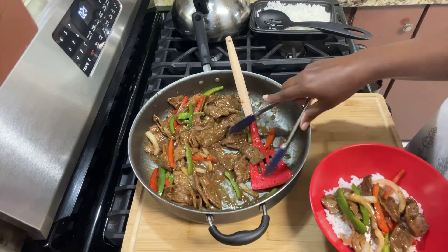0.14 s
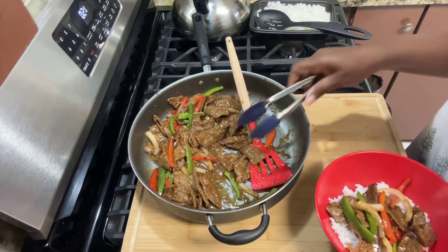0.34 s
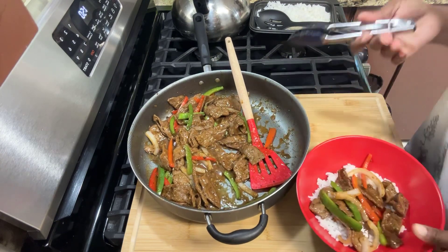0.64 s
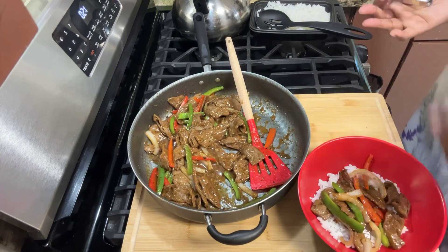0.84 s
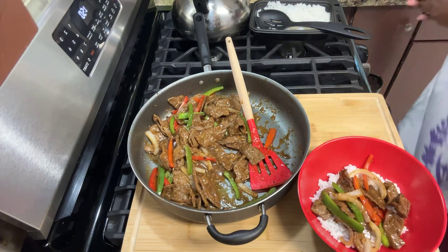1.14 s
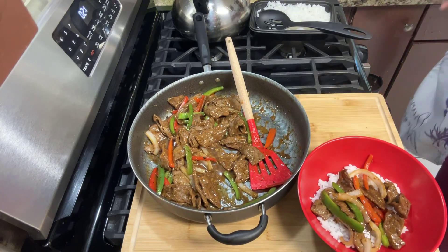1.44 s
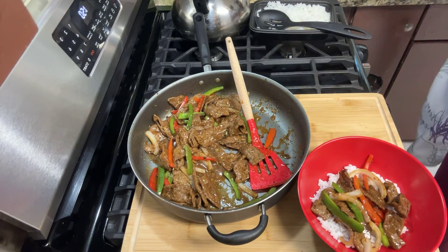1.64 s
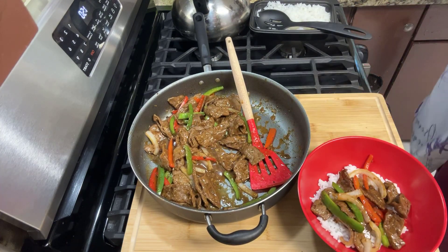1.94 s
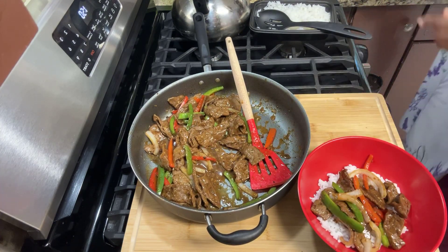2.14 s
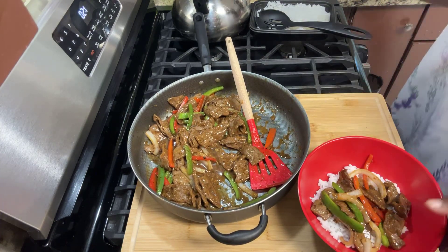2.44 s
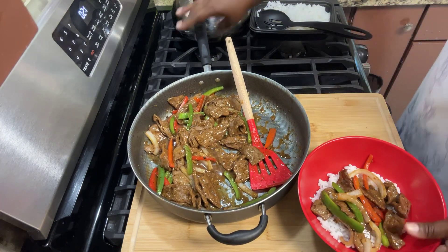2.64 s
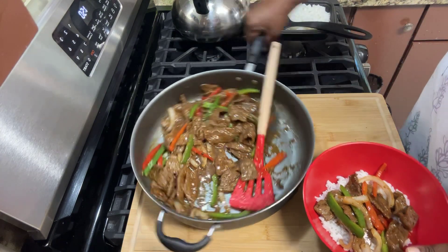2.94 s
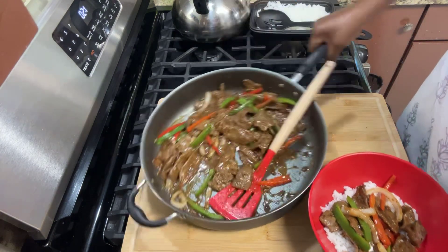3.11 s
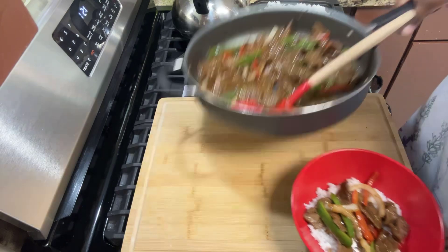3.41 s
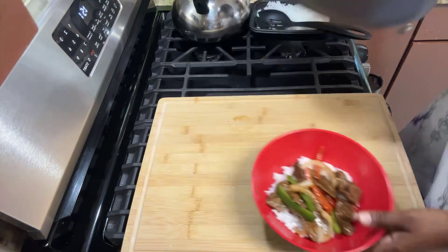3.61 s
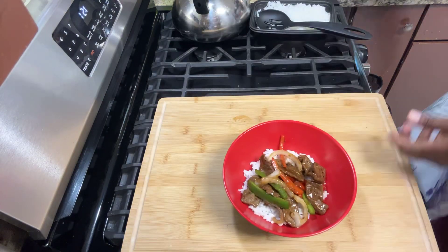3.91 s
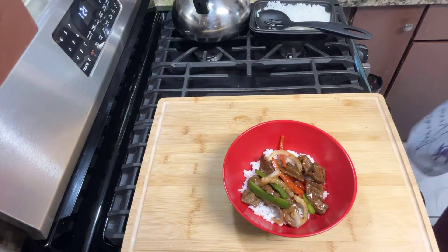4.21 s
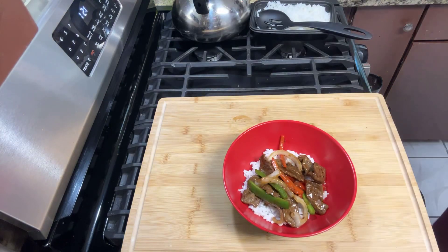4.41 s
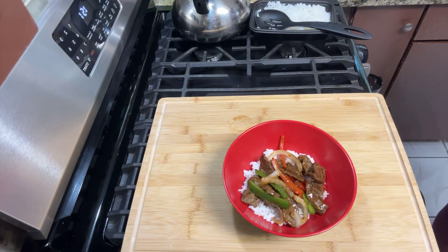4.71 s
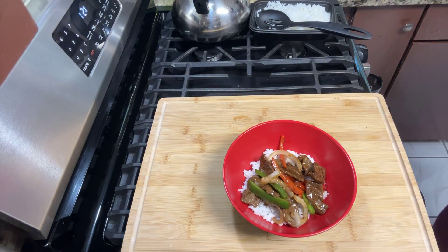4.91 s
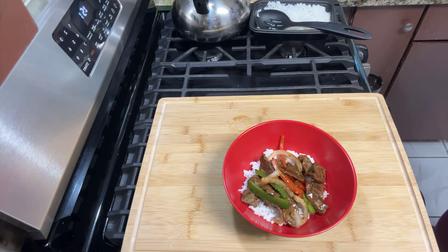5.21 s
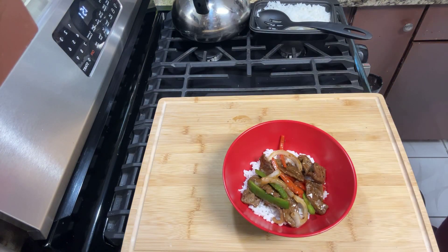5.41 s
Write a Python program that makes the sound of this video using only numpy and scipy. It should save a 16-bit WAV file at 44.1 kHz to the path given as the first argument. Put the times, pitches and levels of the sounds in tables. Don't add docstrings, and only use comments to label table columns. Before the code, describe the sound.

Close microphone, short bright room reflections, steady low refrigerator hum. Tongs clap twice loudly in the first half second, with a flurry of crisp ticks fading by about two seconds. One bright click, faint cloth brushing, then small bumps, a skillet scrape and a hollow plastic bowl slide on wood. Quiet again, before an abrupt pan knock, a short shimmering jingle and small settling thuds.

```python
import sys
import numpy as np
from scipy import signal
from scipy.fft import rfft, irfft
from scipy.io import wavfile

SR = 44100
rng = np.random.default_rng(int(sys.argv[2]) if len(sys.argv) > 2 else 0)


def persist_wave(psi):
    counts = np.round(np.clip(psi, -1, 1) * 32767).astype(np.int16)
    wavfile.write(sys.argv[1], SR, np.atleast_2d(counts).T)


def gain_from_decibels(decibels):
    exponent = np.asarray(decibels, float) / 20
    return 10 ** exponent


N = 244887


def rms_one(x):
    return x / np.sqrt(np.mean(x ** 2) + 1e-20)


def peak_one(x):
    return x / np.max(np.abs(x))


def at_hz(points, hz):
    points = np.array(points)
    return np.interp(np.log(hz), np.log(points[:, 0]), points[:, 1])


def colour(x, spectrum):
    hz = np.maximum(np.fft.rfftfreq(len(x), 1 / SR), 1)
    return irfft(rfft(x) * gain_from_decibels(at_hz(spectrum, hz)), len(x))


def band(x, low_hz, high_hz):
    return signal.sosfilt(signal.butter(2, [low_hz, high_hz], "band", fs=SR, output="sos"), x)


def low_pass(x, hz, order=2):
    return signal.sosfilt(signal.butter(order, np.clip(hz, 300, 20000), fs=SR, output="sos"), x)


def ring(x, hz, t60_s):
    r, w = gain_from_decibels(-60 / (t60_s * SR)), 2 * np.pi * min(hz, 20000) / SR
    return signal.lfilter([0, np.sin(w)], [1, -2 * r * np.cos(w), r * r], x + 1e-18)


def grains(spread_db, per_s):
    sizes = gain_from_decibels(spread_db * np.minimum(rng.exponential(1, N), 4)) * rng.choice([-1, 1], N)
    return rms_one(sizes * (rng.random(N) < per_s / SR))


def wander(per_s):
    return rms_one(band(rng.standard_normal(N), max(.5 * per_s, 3), 2 * per_s))


def level_in_span(strokes):
    t = np.arange(N) / SR
    total = np.zeros(N)
    for start_s, rise_s, hold_s, fall_s, db in strokes:
        corners_s = start_s + np.cumsum(np.abs([0, rise_s, hold_s, fall_s]))
        total += gain_from_decibels(db) * np.interp(t, corners_s, [0, 1, 1, 0], left=0) ** 0.95
    return total


def contact(noise, contact_s, rise_s):
    t = np.arange(len(noise)) / SR
    spectrum = rfft(noise * np.exp(-t / max(contact_s, 5e-4)) * (1 - np.exp(-t / rise_s)))
    flat = irfft(spectrum / np.abs(spectrum) ** .8, len(t))
    return flat * np.exp(-t / max(3 * contact_s, 2e-3))


def add(out, x, start_s):
    i = round(start_s * SR)
    out[i:i + len(x)] += x[:N - i]


def tongs():
    # (time [s], peak level [dB], loudest ring [Hz])
    squeezed = [(0.151, -37, 3620), (0.179, -31, 4700), (0.216, -48.5, 4400), (0.2325, -40.5, 3050),
                (0.2672, -27.5, 14700), (0.3024, -25.5, 13400), (0.339, -37.5, 15000), (0.343, -26, 4370),
                (0.392, -27.5, 6160), (0.4058, -35.5, 3900), (0.4954, -22, 11240), (0.507, -24.5, 5200),
                (0.587, -17, 8850), (0.5991, -12, 3470), (0.6158, -13.5, 7840), (0.753, -31, 7550),
                (0.7816, -23.5, 9250), (0.804, -14.5, 12500), (0.9178, -27, 8800)]
    # (time [s], peak level
    # [dB], loudest ring [Hz])
    shaken = [(1.0238, -19, 9200), (1.0304, -16.5, 8100), (1.0674, -23, 3720), (1.078, -13, 10100),
              (1.121, -33, 13600), (1.1323, -14, 11300), (1.1907, -19.5, 8400), (1.2198, -24.5, 10200),
              (1.2584, -16.5, 8200), (1.347, -27, 8000), (1.3703, -38, 13000), (1.428, -28.5, 5550),
              (1.4515, -24, 8140), (1.4972, -19, 8850), (1.5247, -16.5, 8300), (1.5373, -23, 7800),
              (1.603, -17.5, 11040), (1.6124, -34, 8940), (1.703, -34, 3370), (1.764, -23.5, 4660),
              (1.785, -23.5, 4500), (1.801, -19.5, 8130), (1.812, -24, 2970), (2.1071, -6, 13300),
              (2.959, -27, 14900), (3.69, -33, 13000), (5.219, -39, 14300)]
    # (start [s], rise [s], hold [s], fall [s], level [dB])
    rub_strokes = [
        (0, .001, 0.042, 0.25, -59),
        (.72, 0.2, 0.032, 0.16, -53),
        (1.25, 0.19, 0.058, 0.35, -49.5),
        (1.9, 0.18, 0.16, 0.091, -56.5),
        (2.3, 0.11, 0.23, 0.078, -69.5),
        (2.6, 0.27, 0.09, 0.23, -63),
        (3.25, 0.11, 0.13, .1, -56.5),
    ]
    # (frequency [Hz], level [dB per Hz])
    steel_spectrum = [(880, -56.5), (1500, -15), (2030, -19), (2360, -10.5), (3550, -5), (7030, -8.5),
                      (9890, -1.5), (12600, -8), (15200, -9), (16000, -9), (16500, -48.5)]
    squeeze_contact_s, shake_contact_s = 0.0091, 0.02
    ticks = [(*row, squeeze_contact_s) for row in squeezed]
    ticks += [(*row, shake_contact_s) for row in shaken]
    out = np.zeros(N)
    for time_s, peak_db, hz, contact_s in ticks:
        white = rng.standard_normal(4096)
        hit = contact(white * np.abs(white), contact_s, .0004)
        zing = ring(hit, hz, .008)
        zing = zing + .6 * ring(hit, .57 * hz + 900, .008)
        zing = zing + .6 * ring(hit, 14000 - .5 * hz, .005)
        add(out, gain_from_decibels(peak_db + 0.5) * (peak_one(hit) + 0.2 * peak_one(zing)), time_s)
    rub = grains(3.0, 6000.0) * level_in_span(rub_strokes)
    return colour(band(out + rub, 2117, 19900), steel_spectrum) * gain_from_decibels(8.5)


def struck_modes(hit, modes, own):
    return sum(gain_from_decibels(db + 3 * k) * ring(hit, hz, t60_s) for (hz, db, t60_s), k in zip(modes, own))


def blows(events, body, rise_s, brief, ringing, edge_db):
    # (frequency [Hz], level [dB], t60 [s])
    wall_modes = [(3200, 1.5, 0.01), (3920, -11.5, 0.042), (5230, -18.5, 0.015), (6300, -2, .025)]
    out, size = np.zeros(N), 4096
    for time_s, knock_db, thud_db, clack_db, contact_s in events:
        white, own = rng.standard_normal(size), rng.standard_normal(len(body))
        hit = contact(white, contact_s, rise_s)
        crack = contact(white, brief * contact_s, rise_s)
        sound = peak_one(band(hit, 300, 2440)) + ringing * peak_one(struck_modes(hit, body, own))
        clang = peak_one(band(crack, 3100, 5400))
        clang = clang + 0.37 * peak_one(struck_modes(crack, wall_modes, own))
        shake = gain_from_decibels(thud_db - 19.5) * peak_one(band(band(hit, 72, 130), 69, 240))
        thud = gain_from_decibels(thud_db + 4.5) * peak_one(band(band(sound, 245, 990), 184, 694))
        knock = gain_from_decibels(knock_db - 3) * peak_one(band(sound, 790, 2528))
        clack = gain_from_decibels(clack_db + 11.5) * peak_one(band(clang, 2357, 4810))
        edge = gain_from_decibels(clack_db + edge_db) * peak_one(band(crack, 4270, 10470))
        add(out, shake + thud + low_pass(knock + clack, 8700) + edge, time_s)
    return out


def claps():
    # (time [s], knock peak [dB], thud [dB], clack [dB], contact [s])
    clap_events = [
        (0.427, 5, -16.5, -16, 0.0042),
        (0.432, -7.5, -10.5, -38.5, 0.0027),
        (0.443, -7.5, -13.5, -62, 0.0022),
        (0.5635, -8.5, -11, -19, 0.011),
        (0.589, -2, -17, -19, 0.0094),
        (2.752, -26, -28, -56, 0.011),
    ]
    # (frequency [Hz], level [dB], t60 [s])
    handle_modes = [(397, -2.5, 0.067), (556.5, -7, 0.05), (736, -4.5, 0.09), (1056, 9.5, 0.0248),
                    (1255, -1, 0.0272), (1660, -4.5, 0.071), (1890, -10.5, 0.029)]
    return blows(clap_events, handle_modes, rise_s=0.00005, brief=0.19, ringing=0.5, edge_db=-13)


def taps():
    # (time [s], knock peak [dB], thud [dB], clack [dB], contact [s])
    tap_events = [
        (0.559, -27, -21, -60, 0.0038),
        (0.716, -30, -42, -46, 0.0034),
        (0.7255, -10, -23.5, -47, 0.0034),
        (2.092, -46, -65, -45, .004),
        (4.644, -3, -20, -36, 0.0039),
    ]
    # (frequency [Hz], level [dB], t60 [s])
    hollow_modes = [(392.5, -4, 0.0067), (930, -6.5, 0.036), (1066, 2.5, 0.028), (1248, 1.5, 0.012),
                    (2590, -3, 0.015)]
    return blows(tap_events, hollow_modes, rise_s=0.00027, brief=0.7, ringing=4.5, edge_db=-2)


def pan_blows():
    # (time [s], knock peak [dB], thud [dB], clack [dB], contact [s])
    blow_events = [(0.001, -31, -31, -70, 0.0054), (0.086, -32, -28, -60, 0.006),
                   (2.108, -18.5, -27, -21.5, 0.013), (2.959, -20.5, -34, -32, 0.0045),
                   (3.043, -32.5, -41, -50, 0.029), (3.088, -17.5, -25, -46, 0.011),
                   (3.111, -26, -59, -39, 0.008), (3.165, -51, -48, -56, 0.016),
                   (3.186, -25, -32.5, -41, 0.0083), (3.254, -28.5, -40, -37, 0.011),
                   (3.72, -48, -37, -62, 0.014), (3.746, -48, -32, -62, 0.0095),
                   (3.766, -60, -28, -60, 0.012), (4.203, -46, -63.5, -59, 0.028),
                   (4.226, -48, -70, -55, 0.013), (4.645, -8.5, -10, -23, 0.0023),
                   (4.651, -5, -11, -23.5, 0.012), (4.831, -24, -29.5, -35.5, 0.033),
                   (4.843, -28, -29.5, -51.5, 0.0089), (5.192, -27, -31, -45, 0.0079),
                   (5.221, -37, -39.5, -56, 0.015), (5.258, -32.5, -39.5, -49, 0.016)]
    # (frequency [Hz], level [dB], t60 [s])
    counter_modes = [(296.7, 1, 0.0783), (407, -13, 0.28), (538, -2.5, 0.035), (661, -12, 0.28),
                     (749, -1.5, 0.16), (934, -9, 0.01), (1134, -0.5, 0.077), (1562, -1, 0.0094)]
    return blows(blow_events, counter_modes, rise_s=0.0022, brief=0.65, ringing=0.24, edge_db=4.0)


def slide():
    # (frequency [Hz], width [Hz], level [dB])
    bowl_modes = [(418, 54, 11.5), (419, 17, 0.5), (489.6, 31.5, 2.5), (695.4, 89, 0.5), (925, 64, -18.5),
                  (1069, 190, 8), (1310, 90, -6)]
    # (frequency [Hz], level [dB per Hz])
    hiss_spectrum = [(1200, -1), (1800, -1), (3000, -3), (3700, 0.5), (4000, 7.5), (4400, -1), (6100, -5),
                     (8000, -11), (10000, -7), (12500, -17.5), (14500, -13), (16500, -24)]
    # (start [s], rise [s], hold [s], fall [s], level [dB])
    pan_strokes = [
        (2.85, 0.049, 0.054, .03, -53.5),
        (2.99, 0.095, 0.11, 0.04, -39),
    ]
    bowl_strokes = [
        (3.28, 0.26, 0.14, 0.13, -31),
    ]
    settle_strokes = [
        (0, 0.0012, .01, 0.48, -43.5),
        (4.72, 0.028, 0.076, 0.074, -33),
        (4.85, .04, .2, .3, -43),
    ]
    nudge_strokes = [
        (0, 0.00076, 0.03, .08, -51.5),
        (2.6, 0.029, 0.044, 0.053, -61.5),
        (2.76, 0.039, .05, 0.067, -57),
        (3.76, 0.043, 0.027, 0.038, -50.5),
    ]
    grit_strokes = [
        (4.68, 0.016, 0.043, .05, -42.5),
        (4.88, 0.016, 0.034, 0.14, -47.5),
    ]
    patchy_per_s, patchy_db = 12, 1.5
    rough, fine = grains(4.0, 2500.0), grains(3.5, 7000.0)
    body = np.zeros(N)
    for k, (hz, width_hz, db) in enumerate(bowl_modes):
        level = (-1) ** k * gain_from_decibels(db + patchy_db * wander(patchy_per_s))
        body += level * np.sqrt(width_hz) * ring(rough, hz, 2.24 / width_hz)
    body = rms_one(body) + 0.69 * rms_one(band(rough, 441, 999))
    hiss = rms_one(colour(fine, hiss_spectrum))
    scuff = rms_one(band(fine, 660, 4100))
    bowl = (1.03 * body + gain_from_decibels(-9.5) * hiss) * level_in_span(bowl_strokes)
    nudges = hiss * level_in_span(nudge_strokes)
    pan = (0.72 * low_pass(hiss, 10500) + 0.47 * scuff) * level_in_span(pan_strokes)
    grit = scuff * level_in_span(grit_strokes)
    settling = (0.58 * body + gain_from_decibels(-16) * scuff) * level_in_span(settle_strokes)
    return bowl + nudges + pan + grit + settling


def jingle():
    # (time [s], level [dB])
    touches = [
        (4.833, -26.5),
        (4.85, -22.5),
        (4.86, -31),
        (4.88, -43),
    ]
    jingler_hz = [2135, 4382, 5830, 6616, 7548, 7649, 8060, 9313, 9390, 9860, 10010, 10380, 10590, 11152,
                  11500, 11870, 11950, 13439, 13557, 14080, 14846, 14883, 15720]
    # (level [dB], t60 [s])
    jingler_modes = [(-16, 0.28), (-12.5, 0.12), (-18, 0.2), (-23, 0.205), (-10.5, 0.24), (-19, 0.14),
                     (-43, .2), (-2, 0.21), (-14, 0.059), (-28, 0.053), (-24, .12), (-35, .2), (-23, 0.15),
                     (-9, 0.25), (-18, 0.1), (-11.5, 0.09), (-14, .15), (-6.5, 0.23), (-10, 0.17),
                     (-16, 0.14), (-11.5, 0.17), (-17, 0.16), (-17, 0.15)]
    chatter_s, rocking_per_s, rocking_db = 0.017, 30, 3.5
    first, size = round(4.8 * SR), SR // 2
    t = (first + np.arange(size)) / SR
    chatter = np.zeros(size)
    for time_s, db in touches:
        chatter += gain_from_decibels(db) * (t > time_s) * np.exp(-np.maximum(t - time_s, 0) / chatter_s)
    drive = chatter * grains(2.0, 1500.0)[:size]
    rings = np.zeros(size)
    for hz, (db, t60_s) in zip(jingler_hz, jingler_modes):
        own_drive = drive * rng.normal(1, .9, size)
        rocking = gain_from_decibels(db + rocking_db * wander(rocking_per_s)[:size])
        rings += rocking * peak_one(ring(own_drive, hz, min(t60_s, .19)))
    nearby_hz = rng.choice(jingler_hz[2:], 40) * rng.normal(1, .015, 40)
    minor = sum(peak_one(ring(drive, hz, .1)) for hz in nearby_hz)
    out = np.zeros(N)
    add(out, gain_from_decibels(-20) * rings + gain_from_decibels(-40.5) * minor + 0.14 * band(drive, 1200, 12000), first / SR)
    return out


def fridge():
    # (multiple of hum_hz, level [dB rms])
    hum_partials = [(1, -30.5), (2, -57.5), (3, -62.5), (4, -59), (5, -57), (6, -69), (7, -75)]
    # (frequency [Hz], level [dB per Hz])
    air_spectrum = [(20, -23), (45, -6), (70, -4), (95, -0.5), (125, -3.5), (195, -17), (290, -17),
                    (420, -18.5), (600, -26.5), (1200, -31), (3500, -37), (7500, -48.5), (13000, -44),
                    (16000, -50)]
    hum_hz, air_db = 58.95, -46.5
    turns = 2 * np.pi * hum_hz * np.arange(N) / SR
    tone = sum(gain_from_decibels(db) * np.sin(round(k) * (turns - 1.4)) for k, db in hum_partials)
    air = rms_one(colour(rng.standard_normal(N), air_spectrum))
    return np.sqrt(2) * tone + gain_from_decibels(air_db) * air


def kitchen(x):
    # (frequency [Hz], t60 [s])
    decay_times = [(200, 0.58), (600, 0.3), (1500, 0.3), (4000, 0.35), (9000, 0.34), (15000, 0.099)]
    t, edges_hz = np.arange(SR // 2) / SR, 120 * 2 ** np.arange(0, 7.3, .5)
    white = rng.standard_normal((2, len(t)))
    tail = np.zeros(len(t))
    for k, (low_hz, high_hz) in enumerate(zip(edges_hz, edges_hz[1:])):
        t60_s = at_hz(decay_times, np.sqrt(low_hz * high_hz))
        tail += band(white[k % 2], low_hz, high_hz) * gain_from_decibels(-60 * t / t60_s)
    tail = tail * (1 - np.exp(-t / 0.00323))
    return signal.fftconvolve(x, tail / np.sqrt(np.sum(tail ** 2)))[:N]


def scene():
    wet_db, clap_wet_db = -6.5, -6.5
    near = claps() + taps()
    handled = tongs() + slide() + pan_blows()
    bright = jingle()
    to_walls = gain_from_decibels(wet_db) * (handled + .5 * bright) + gain_from_decibels(clap_wet_db) * low_pass(near, 3000)
    return (near + handled + bright + kitchen(to_walls) + fridge())[None]


def roll_off(x):
    return signal.sosfilt(signal.butter(12, 17040, fs=SR, output="sos"), x)


def record(dry):
    # (frequency [Hz], level [dB])
    mic_response = [(1000, 0.5), (3900, -2), (6500, 0), (10000, -1.5), (11500, 0), (12600, -5), (14000, 5),
                    (16000, -4)]
    x = 1.473 * np.tanh(colour(dry[0], mic_response)[None] / 1.575)
    x = .94 * low_pass(x, 15850, order=30) + .06 * x
    return roll_off(x)


dry = scene()
out = record(dry)
persist_wave(out)
```